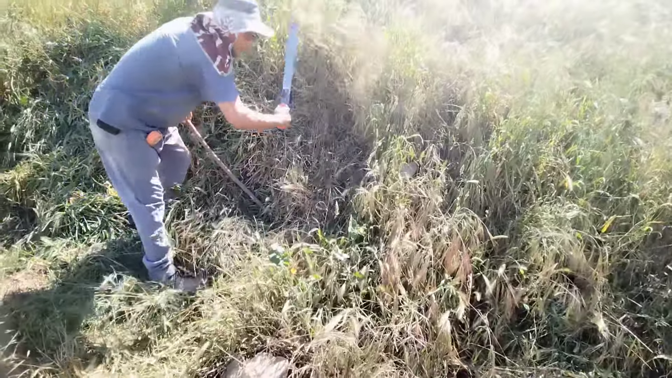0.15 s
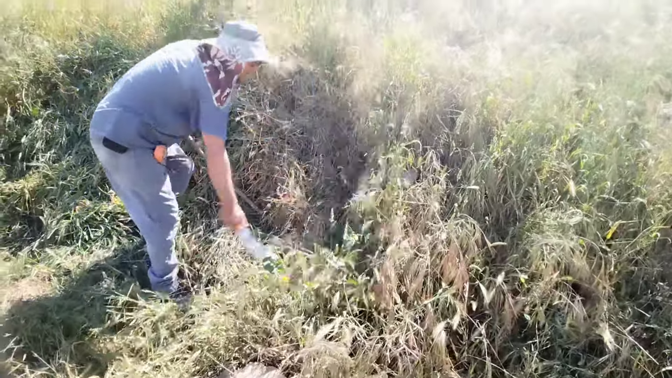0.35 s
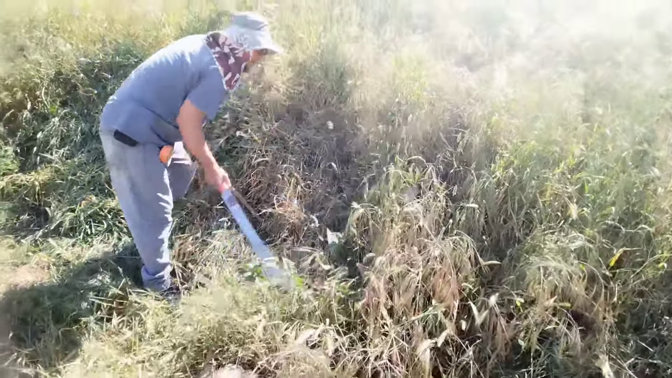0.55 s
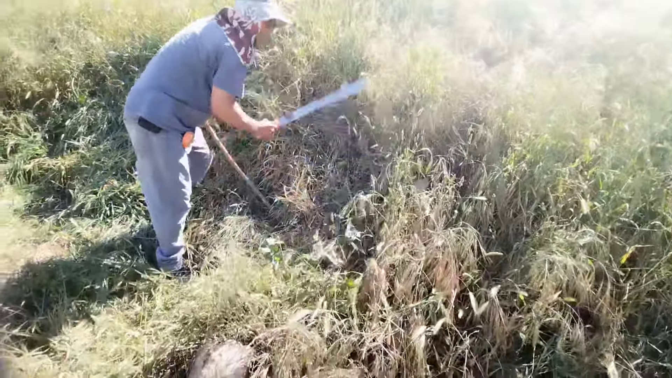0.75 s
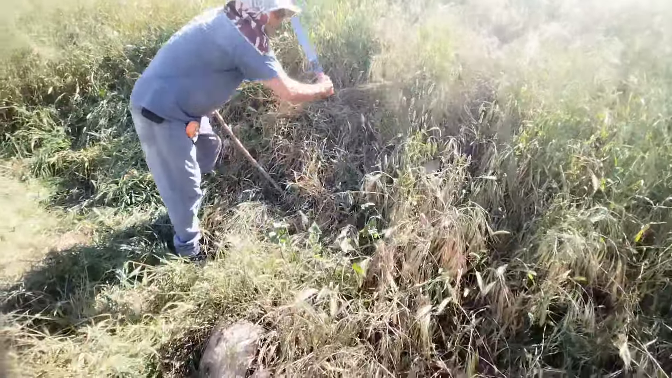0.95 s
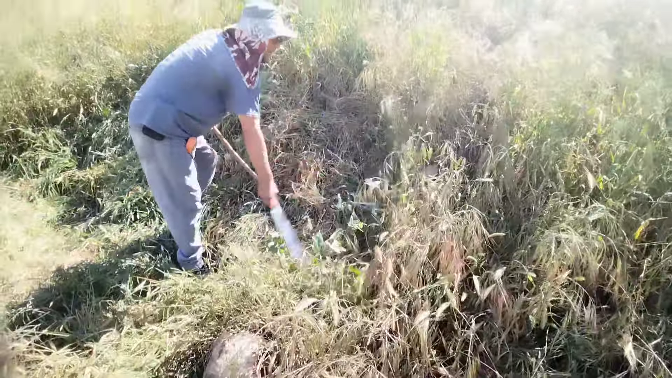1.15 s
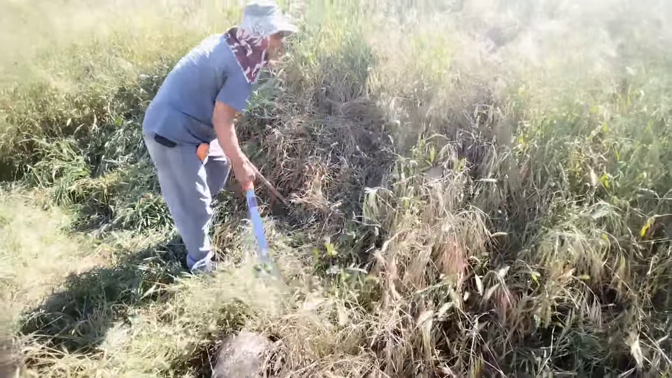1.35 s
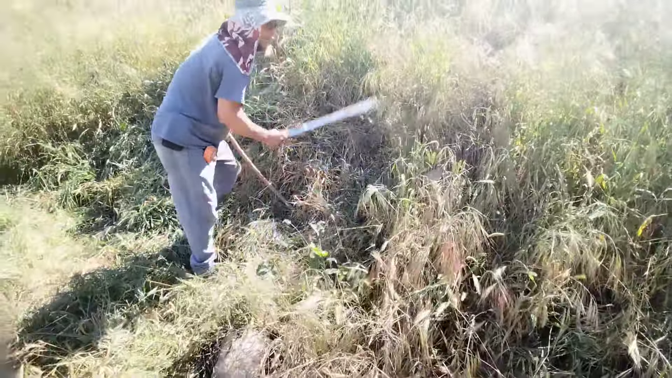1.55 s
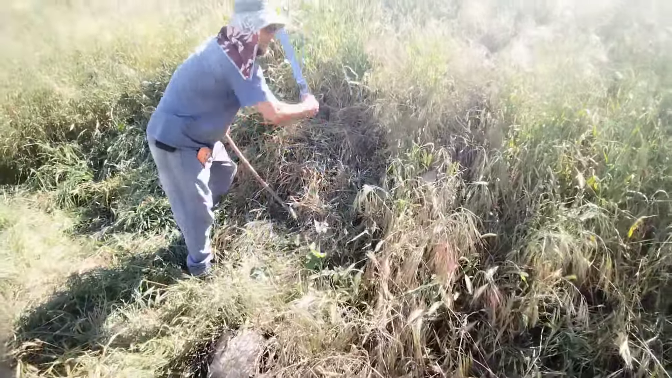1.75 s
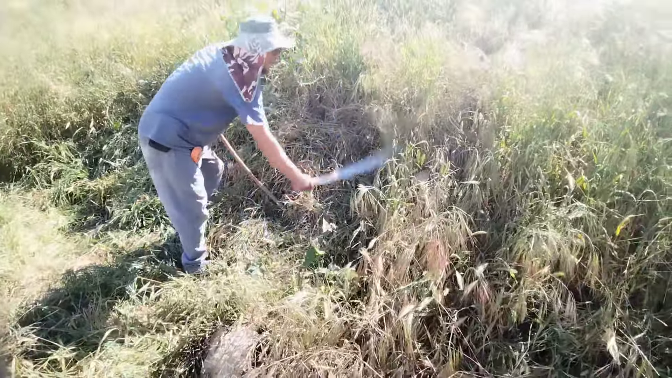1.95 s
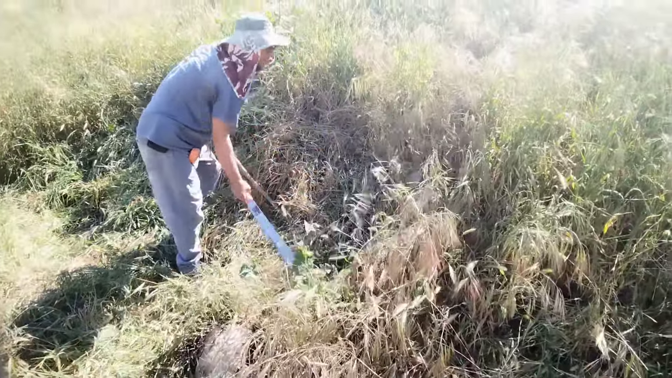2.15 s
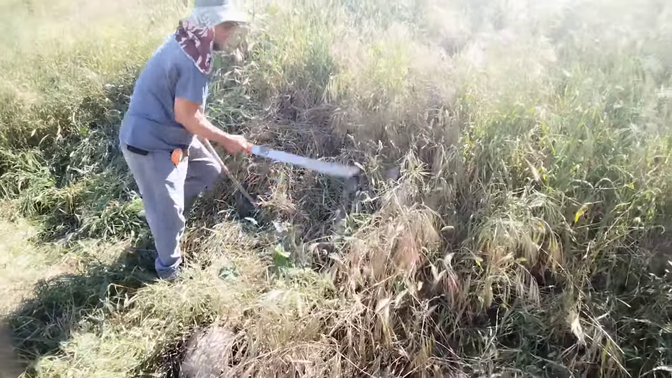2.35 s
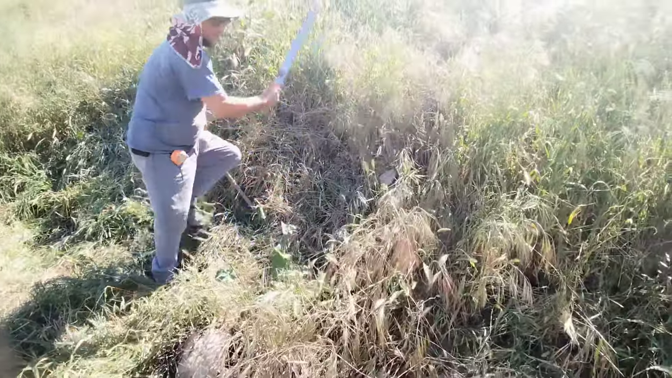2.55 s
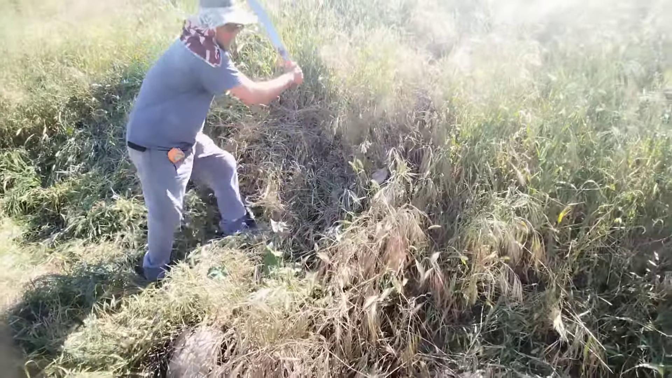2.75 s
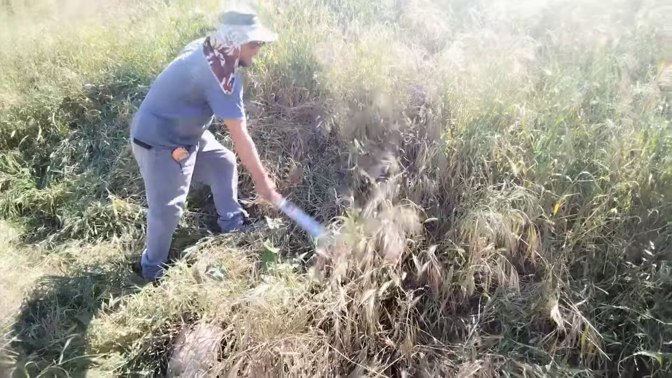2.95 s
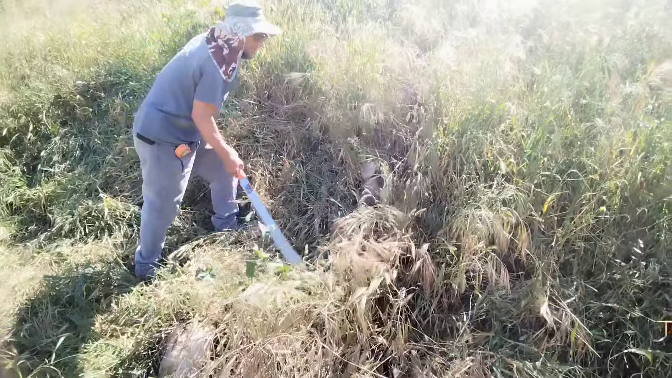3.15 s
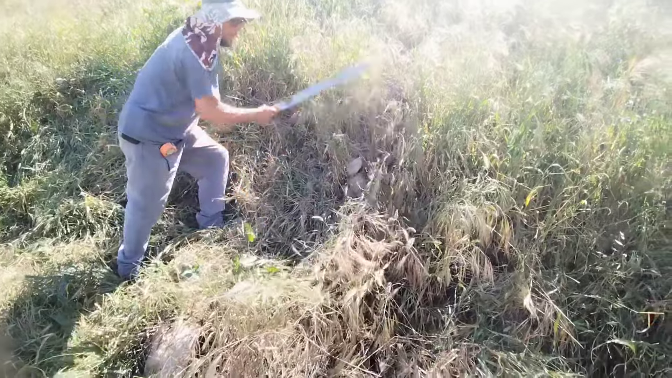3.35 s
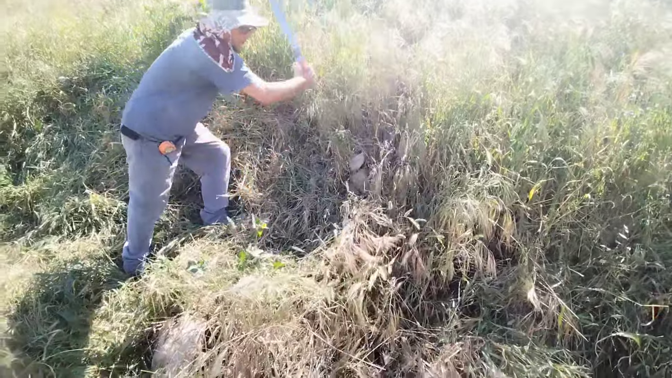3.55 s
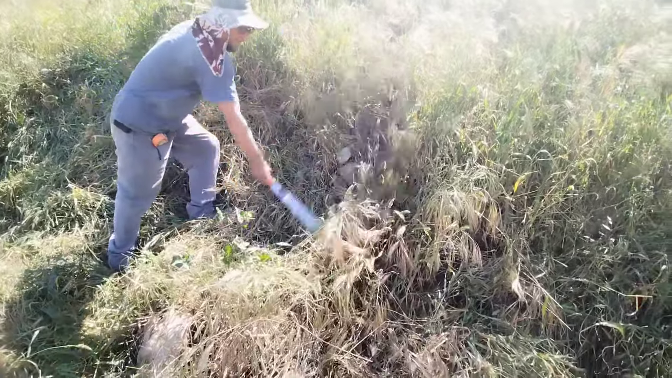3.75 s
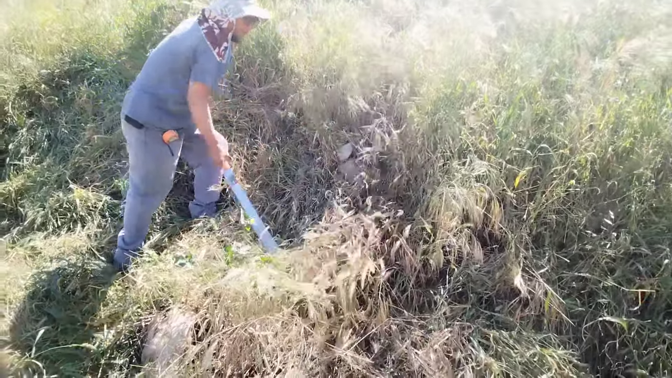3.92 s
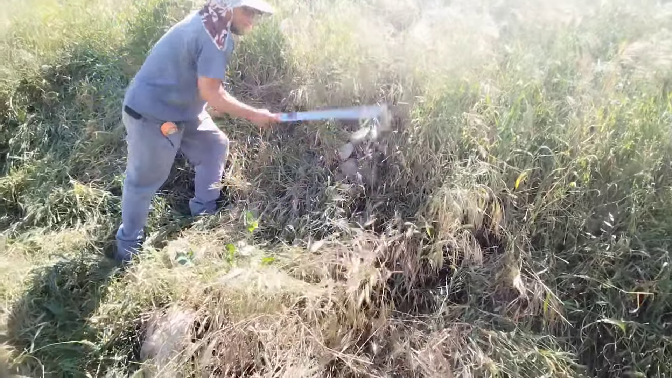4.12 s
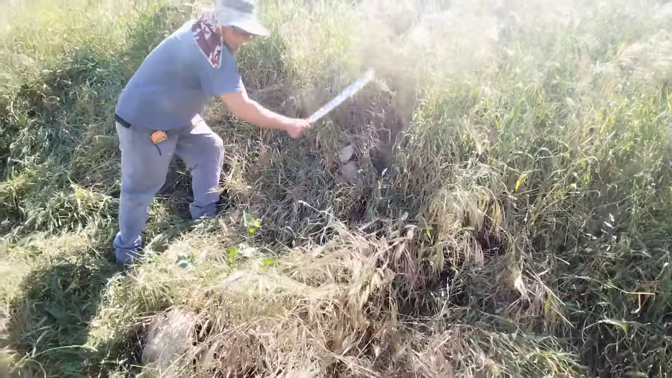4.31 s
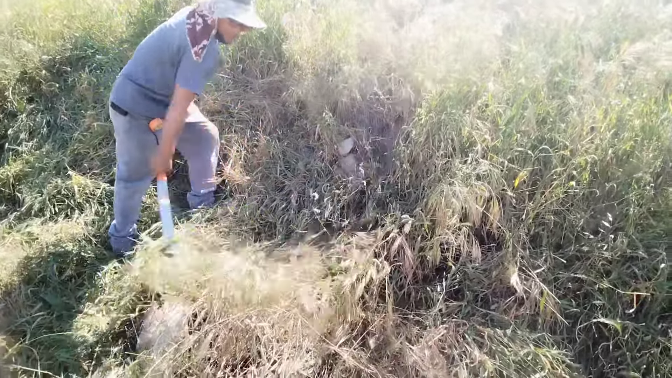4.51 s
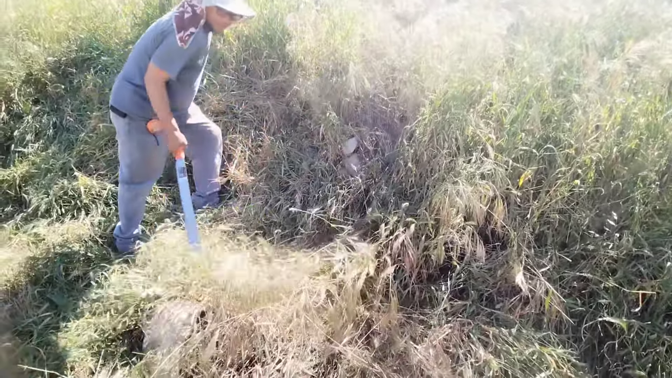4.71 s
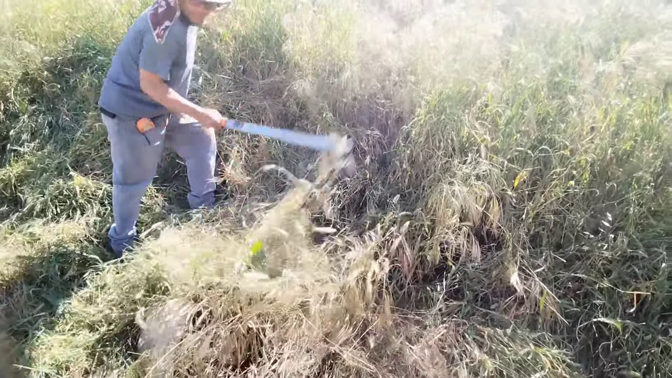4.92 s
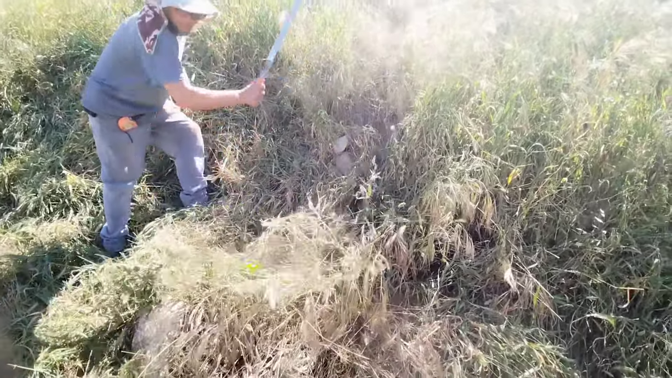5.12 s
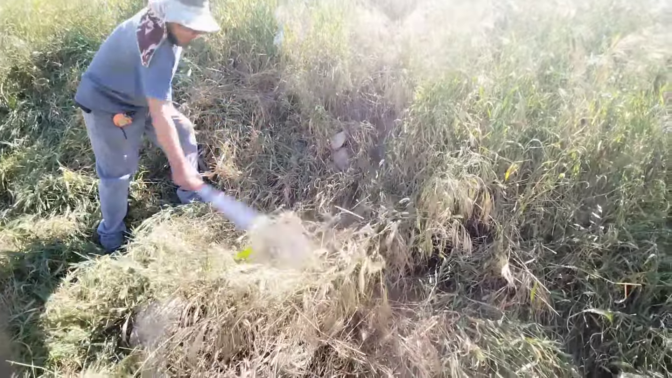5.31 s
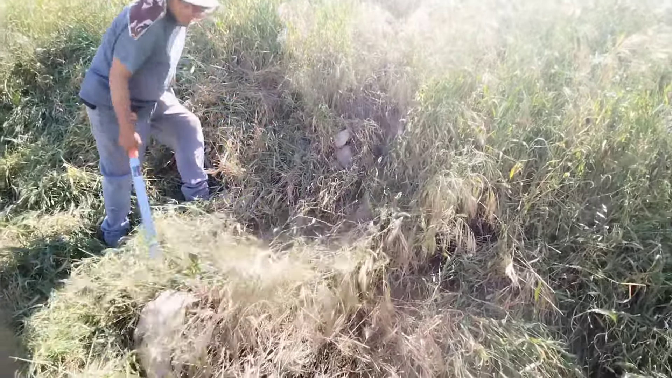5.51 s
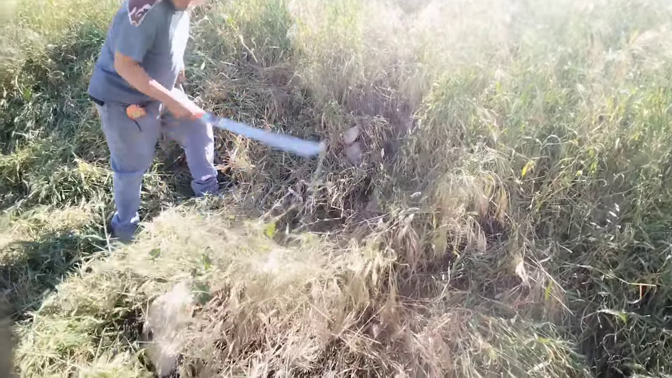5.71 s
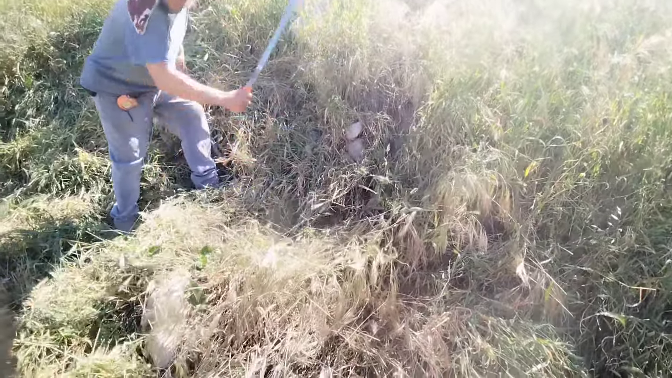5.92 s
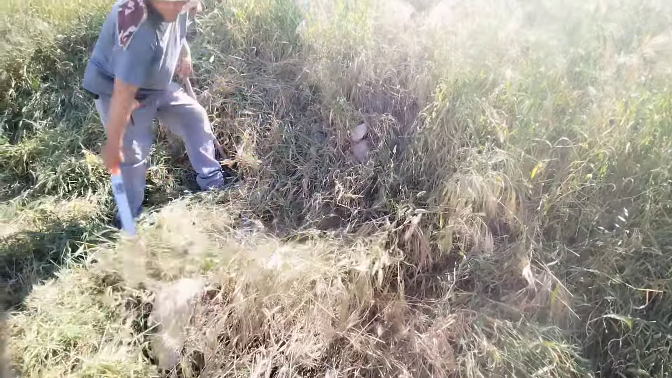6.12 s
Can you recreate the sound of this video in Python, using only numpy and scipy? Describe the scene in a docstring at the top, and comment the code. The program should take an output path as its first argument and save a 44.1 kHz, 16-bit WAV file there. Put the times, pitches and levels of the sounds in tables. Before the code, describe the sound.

In an open field, a machete works through tall dry grass a few metres away, close to dry, over a low, wavering hum like a far engine. Leaves rustle at the start, then crisp, crackling strokes land at about 0.4, 1.2, 2.0, 3.0, 3.75, 4.4, 5.4 and 6.15 seconds. Each lasts about a tenth of a second: a bright hiss of splitting leaves, lower tearing and sharp stalk snaps, some with a fleeting high squeal. The third ends in a short woody knock near 2.1. Between strokes, cut grass settles and loose leaves brush in swelling sweeps, notably at 0.8, 2.5-2.8, 4.3 and 4.9. Thin steel scrapes ring briefly, clearest around 0.8 and 4.1, where two dull thumps also fall. The stroke near 4.4 bites more gradually; the last is short and sharp, fading into rustle and hum.

```python
"""An open field: tall dry grass is cut with a machete a few metres away, in eight strokes.
Each stroke is patchy, crackling noise: a hiss of splitting leaves over a lower tearing of stalks.
Noise swells make the rustle; brief bursts, the snaps; narrow-band noise, the squeals. Scrapes of noise
excite the blade's ringing modes. A knock, thumps and pips are short sines. A low hum of
coloured noise and two wavering tones lies under it all."""
import sys
import numpy as np
from scipy import signal
from scipy.fft import rfft, irfft
from scipy.io import wavfile
from scipy.ndimage import uniform_filter1d

SR = 44100
rng = np.random.default_rng(int(sys.argv[2]) if len(sys.argv) > 2 else 0)


def output_pcm(signal):
    """Save a mono or channel-first signal as 16-bit PCM at the path in sys.argv[1].

    Samples are clipped to [-1, 1] before scaling.
    """
    pcm = np.clip(np.atleast_2d(signal).T, -1, 1) * 32767
    wavfile.write(sys.argv[1], SR, np.round(pcm).astype(np.int16))


N = 276507
TIME = np.arange(N) / SR
FREQS = np.fft.rfftfreq(N, 1 / SR)

# Strokes of the edge through a bunch of stalks: (first touch [s], time to bite in [s], time in the
# bunch [s], time to fade by 20 dB [s], relative hiss of leaves [dB], relative tearing of stalks [dB])
STROKES = [ (0.373, 0.01845, 0.0592, 0.021, -15.5, -27.5), (1.179, 0.01855, 0.057, 0.0793, -15.5, -28),
           (2, 0.024, 0.0805, 0.0516, -15.5, -28), (2.957, 0.0366, 0.0704, 0.0438, -18.5, -35),
           (3.747, 0.058, .06, 0.0656, -17, -27), (4.42, 0.1028, 0.0402, 0.0965, -18.5, -33.5),
           (5.38, 0.0241, 0.0244, 0.0566, -15, -27.5), (6.14, 0.0147, 0.0096, 0.0313, -13, -24.5), ]
# Spectrum of splitting leaves and snapping stalks: (frequency [Hz], relative density [dB per Hz])
SPLITTING_SPECTRUM = [(1060, -39.5), (1800, -12.5), (2020, -29.5), (2290, -1), (2480, -24), (2710, -5.5),
                      (3150, -5), (4110, -12.5), (4780, -5.5), (6340, -3.5), (7440, 3), (10300, -16.5),
                      (13700, -14), (14600, -32), (15000, -44)]
# Cutting at the two microphone ports: (frequency [Hz], left-right correlation [-1 to 1],
# left minus right level [dB])
CUTTING_PORTS = [(300, 1, 7), (1000, 1, 7.5), (1800, 0.84, 5), (2767, 0.64, -7.5), (4230, -0.14, -4.5),
                 (5660, -0.116, -6), (7350, 0.135, 1.5), (11000, -0.23, -5.5)]


def amp(db):
    """Level to amplitude: 20 dB is a factor of ten."""
    return 10 ** (np.asarray(db) / 20)


def evened(x):
    """Normalization: scales to an rms of one."""
    return x / np.sqrt(np.mean(x ** 2) + 1e-20)


def read(points, column=1):
    """Interpolation of one table column along a logarithmic frequency axis."""
    points = np.asarray(points, float)
    return np.interp(np.log(FREQS + 1), np.log(points[:, 0]), points.T[int(column)])


def add(mix, s, sound):
    """Superposition: adds a sound to the mix at time s."""
    part = mix[..., max(round(s * SR), 0):][..., :sound.shape[-1]]
    part += sound[..., :part.shape[-1]]


def pan(db):
    """Interchannel level difference: gains of the two channels for a left minus right level."""
    return amp(np.array([[db], [-db]]) / 2)


def drift(hz):
    """Low-pass filtered noise: slow random wandering with an rms of one."""
    spectrum = rfft(rng.standard_normal(N))
    return evened(irfft(spectrum / (1 + (FREQS / hz) ** 4), N))


def patchy_noise(patchy_db, size=(15, 3)):
    """Time-frequency modulation: two noises share short, narrow peaks, as hollow stalks differ in pitch."""
    z = signal.stft(rng.standard_normal((2, N)), nperseg=1024, noverlap=896)[2]
    frames, bins = size
    patches = uniform_filter1d(rng.standard_normal(z.shape[1:]), frames, axis=1)
    patches = evened(uniform_filter1d(patches, bins, axis=0))
    noise = signal.istft(z * amp(patchy_db * patches), nperseg=1024, noverlap=896)[1]
    return evened(noise[:, :N])


def coloured(size, spectrum, ports, patchy_db=0):
    """Spectral shaping of enveloped noise, with partial correlation between the two ports."""
    noise = patchy_noise(patchy_db) if patchy_db else rng.standard_normal((2, N))
    a, b = rfft(size * noise)
    same = np.clip(read(ports), -.99, .99)
    pair = np.array([a, same * a + np.sqrt(1 - same ** 2) * b])
    left, right = amp(read(ports, 2) / 2), amp(-read(ports, 2) / 2)
    # rms of the mean of both ports; left * right is one
    centre = np.sqrt(left ** 2 + right ** 2 + 2 * same) / 2
    return irfft(pair * [left, right] / centre * evened(amp(read(spectrum))), N)


def crackle(per_s, spread_db, grain_s, smooth):
    """Shot noise of breaking fibres: decaying bursts of very unequal size over a smooth share of power."""
    breaks = rng.random(N)
    burst_db = spread_db * np.minimum(rng.exponential(1, N), 4)
    power = amp(burst_db) ** 2 * (breaks < per_s / SR)
    power = signal.lfilter([1], [1, -np.exp(-1 / (grain_s * SR))], power)
    smooth = np.clip(smooth, 0, 1)
    return np.sqrt(smooth + (1 - smooth) * power / power.mean())


def swell(peak_s, rise_s, fall_s):
    """Exponential growth to one and decay after it, 20 dB in each given time (signs ignored)."""
    return amp(-20 * np.maximum((peak_s - TIME) / abs(rise_s), (TIME - peak_s) / abs(fall_s)))


def shelved(x, hz, low=1, high=1):
    """Band splitting: the parts below and above hz each get their own gain."""
    bass = irfft(rfft(x) / (1 + (FREQS / hz) ** 8), N)
    return low * bass + high * (x - bass)


def hum():
    """Superposed low rumble, as of a far engine, faint open air, and two frequency-modulated tones."""
    # Spectra of rumble and open air: (frequency [Hz], relative density [dB per Hz])
    rumble_spectrum = [(15, -61.5), (25, -28), (35, -37.5), (47, -17.5), (70, -4.5), (102, -1), (124, -2.5),
                       (152, 0.5), (172, -3.5), (252, -6), (279, -8), (383, -26), (520, -32.5),
                       (680, -39.5), (1140, -120)]
    air_spectrum = [(300, 2.5), (500, -19), (700, -3), (1000, -28), (1800, -33.5), (3000, -16.5),
                    (6000, -21), (14000, -29.5)]
    # Hum at the two ports: (frequency [Hz], left-right correlation [-1 to 1], left minus right level [dB])
    hum_ports = [(50, 0.76, 2.96), (300, 0.75, 1), (2000, .4, 7.5)]
    # Rumble and air above the split frequency: (time [s], gain [dB])
    upper_gain = [(0, 0), (1, -4.5), (2.5, 1), (3.7, -1.5), (4.5, 4), (5.7, 3), (6.27, 2)]
    # Tones before their random wavering: (time [s], lower tone level [dB], upper tone level [dB])
    tone_levels = [(0, -53, -43), (1, -54.5, -45.5), (1.7, -46, -38), (3.3, -43.5, -53.5),
                   (4.4, -57, -53.5), (5.2, -39, -62), (6.27, -45.5, -57)]
    # Mean pitches of the tones: (lower [Hz], upper [Hz])
    tone_hz = [105.85, 147.83]
    rumble_db, split_hz = -39.5, 190

    level = amp(rumble_db + 1.37 * drift(hz=4.86))
    out = coloured(level, rumble_spectrum, hum_ports)
    out += coloured(amp(-61.5), air_spectrum, hum_ports)
    out = shelved(out, split_hz, high=amp(np.interp(TIME, *np.transpose(upper_gain))))
    s, *levels = np.transpose(tone_levels)
    for hz, db in zip(tone_hz, levels):
        turns = np.cumsum(hz * (1 + 0.02194 * drift(hz=4.95))) / SR
        tone_amp = amp(np.interp(TIME, s, db) + 2.8 * drift(hz=7))
        out += pan(db=2.7) * tone_amp * np.sin(2 * np.pi * turns)
    return out


def rustle():
    """Friction noise: dry leaves brush as cut grass falls and the blade is drawn back; powers add."""
    # Sweeps of blade and boots through loose grass: (peak time [s], time to swell by 20 dB [s],
    # time to fade by 20 dB [s], relative leaf rustle [dB], relative stalk crunch [dB])
    sweeps = [ (0.02, 2.08, 0.41, -33, -49.5), (0.18, 0.15, 0.78, -34, -39), (0.33, 0.33, .1, -39.5, -46.5),
              (0.831, .5, 0.1764, -35, -53), (1.154, .004, .045, -31, -48.5),
              (1.47, 0.3028, 0.24, -39, -52.5), (1.629, 0.0921, 0.1033, -37, -50.5),
              (1.781, .5, 0.1437, -43.5, -47.5), (2.489, .5, 0.32, -35.5, -45),
              (2.8, 0.4026, 0.0815, -32, -42), (3.23, 0.02, 0.1533, -40, -56.5),
              (3.4, 0.176, 0.1344, -37.5, -49), (3.491, 0.39, 0.0722, -40.5, -51.5),
              (4.099, 0.27, 0.38, -40.5, -53.5), (4.29, 0.4138, 0.07, -36, -49),
              (4.43, 0.1456, 0.09, -33, -49), (4.9, 0.7387, 0.3483, -33, -48),
              (5.52, 0.1762, 0.31, -37, -54), (5.73, 0.2172, 0.1867, -34, -48.5),
              (5.9, -0.4, 0.48, -50.5, -66), ]
    # Spectra of leaves and crunching stalks: (frequency [Hz], relative density [dB per Hz])
    leaf_spectrum = [(1120, -31), (1900, -13.5), (2110, -36), (2280, -9.5), (2530, -12), (3030, -4.5),
                     (4320, -10), (5500, -0.5), (6370, 0), (7380, 2.5), (10500, -12), (13900, -9.5),
                     (14600, -26.5), (15000, -49)]
    crunch_spectrum = [(60, -38), (250, -3.5), (450, -1.5), (750, 4), (1200, -4.5), (1800, 0), (2600, 3),
                       (4000, -15)]
    # Rustle at the two ports: (frequency [Hz], left-right correlation [-1 to 1],
    # left minus right level [dB])
    rustle_ports = [(703, 0.55, 2), (1810, 0.28, 1.5), (2734, -0.13, -16), (4200, 0.067, -8),
                    (5650, 0.071, -11.5), (7340, 0.096, -2.5), (11000, -0.067, -11.5)]
    # after every stroke the cut grass settles, fading by 20 dB in settle_s
    settle_leaf_db, settle_crunch_db, settle_s = -39, -50, 0.47
    # dry grass is never quite still; leaves moving more gently than soft_db only fizz, above fizz_hz
    stir_db, soft_db, fizz_hz = -64, -43.5, 2500

    settling = []
    for touch, bite_s, bunch_s, *_ in STROKES:
        stroke_end = touch + bite_s + bunch_s
        settling.append((stroke_end, bunch_s, settle_s, settle_leaf_db, settle_crunch_db))
    leaf_power, crunch_power = amp(stir_db) ** 2, 0
    for peak_s, rise_s, fall_s, leaf_db, crunch_db in sweeps + settling:
        motion = swell(peak_s, rise_s, fall_s)
        leaf_power = leaf_power + (amp(leaf_db) * motion) ** 2
        crunch_power = crunch_power + (amp(crunch_db) * motion) ** 2
    clumps = evened(amp(0.82 * drift(hz=44.7)))
    leaves = np.sqrt(leaf_power) * clumps
    leaves *= crackle(per_s=1500, spread_db=2.5, grain_s=.0006, smooth=.65)
    crunch = np.sqrt(crunch_power) * clumps
    crunch *= crackle(per_s=200, spread_db=3.5, grain_s=0.0021, smooth=0.458)
    out = amp(1.58) * coloured(leaves, leaf_spectrum, rustle_ports, patchy_db=3)
    out += amp(1.0) * coloured(crunch, crunch_spectrum, rustle_ports, patchy_db=4.0)
    return shelved(out, fizz_hz, low=np.sqrt(leaf_power / (leaf_power + amp(soft_db) ** 2)))


def snaps(decay_s=0.00245):
    """Impulsive fracture: a thick stalk gives way in one brief, exponentially decaying crack."""
    # Single stalks snapping: (time [s], relative initial level [dB])
    cracks = [(0.213, -15), (0.3474, -9.5), (0.4014, -0.5), (0.4502, -0.5), (1.1507, -10), (1.2114, 1.5),
              (1.9146, -29.5), (1.942, -27), (2.043, -2), (2.091, -1), (2.1469, -14), (2.976, -10),
              (3.0095, -1.5), (3.0683, -7), (3.8095, 2), (3.838, -2), (5.384, -17.5), (6.1546, -1.5)]
    size, t = np.zeros(N), TIME[:2048]
    for s, db in cracks:
        add(size, s, amp(db) * np.exp(-t / decay_s))
    return amp(-9) * coloured(size, SPLITTING_SPECTRUM, CUTTING_PORTS)


def cuts():
    """Successive fracture: the edge splits a bunch densely, with a lower tearing body."""
    # Spectrum of tearing thick stalks: (frequency [Hz], relative density [dB per Hz])
    tear_spectrum = [(30, -55.5), (100, -24.5), (250, 1), (450, -9), (700, -0.5), (1200, -5), (1800, -4),
                     (2600, -1.5), (4000, -21.5)]
    # the first leaves are quieter than the bunch; through the bunch the hiss sags and the tearing grows
    touch_hiss_db, touch_tear_db, hiss_sag_db, tear_growth_db = -18, -23.5, -2.5, 4.5

    hiss, tear = np.zeros((2, N))
    for touch, bite_s, bunch_s, fade_s, hiss_db, tear_db in STROKES:
        stages = touch + np.cumsum([0, bite_s, bunch_s])
        onset = np.clip((TIME - touch) / 0.00336, 0, 1)
        contact = onset * amp(-20 * np.maximum(TIME - stages[-1], 0) / fade_s)
        hiss += contact * amp(hiss_db + np.interp(TIME, stages, [touch_hiss_db, 0, hiss_sag_db]))
        tear += contact * amp(tear_db + np.interp(TIME, stages, [touch_tear_db, -tear_growth_db, 0]))
    clumps = evened(amp(0.91 * drift(hz=110)))  # stalks stand in tufts
    hiss *= clumps * crackle(per_s=2600, spread_db=2.2, grain_s=.0005, smooth=.45)
    tear *= clumps * crackle(per_s=900, spread_db=2.5, grain_s=.001, smooth=.35)
    hiss = amp(-.5) * coloured(hiss, SPLITTING_SPECTRUM, CUTTING_PORTS, patchy_db=4.5)
    tear = amp(1.5) * coloured(tear, tear_spectrum, CUTTING_PORTS, patchy_db=2)
    return hiss + tear


def squeals():
    """Stick-slip friction: a stalk on the edge gives a short, fuzzy whistle of narrow-band noise."""
    # Squeals against the edge: (time [s], length [s], centre frequency [Hz], width at half
    # amplitude [Hz], level [dB], left minus right level [dB])
    whistles = [(0.389, 0.061, 7360, 160, -23, 5), (1.146, 0.066, 2742, 79, -35, -13.5),
                (1.148, 0.061, 3133, 110, -39.5, -15), (2.022, 0.099, 7434, 204, -30, -2.5),
                (3.004, 0.0204, 7360, 120, -16.5, 3.5), (3.066, 0.0187, 4940, 120, -29, -6),
                (3.807, 0.069, 7354, 200, -24.5, 1.5), (4.418, 0.072, 8007, 100, -32, -6),
                (4.512, 0.0277, 6778, 100, -20.5, -2.5), (5.392, 0.0223, 2289, 90, -23, 4.5)]
    out = np.zeros((2, N))
    for s, length, hz, width, db, side_db in whistles:
        count = int(length * SR)
        resonance = 1 / (1 + (2 * (FREQS - hz) / width) ** 2)
        tone = irfft(rfft(rng.standard_normal(N)) * resonance, N)[:count]
        add(out, s, pan(side_db) * amp(db) * evened(tone) * signal.windows.tukey(count, .1))
    return out


def small_sounds():
    """Damped sines knock on wood; windowed sines give dull thumps of a few cycles and pips of about ten."""
    # The blade knocks on a woody stem: (time [s], level [dB])
    knock = (2.1038, -8)
    # Modes of the stem: (frequency [Hz], relative level [dB], time to decay by 60 dB [s])
    wood_modes = [(910, -22.5, .02), (1450, -29, 0.02016), (1875, 4.5, 0.0178), (2235, -0.5, 0.03),
                  (2825, -6, 0.02)]
    # Dull thumps and short hollow pips: (time [s], length [s], frequency [Hz], level before panning [dB])
    thumps = [(4.106, 0.01064, 160, -16), (4.193, 0.0155, 148.5, -24)]
    pips = [(0.665, 0.0088, 1000, -36.5), (2.293, 0.011, 886, -37), (4.352, 0.0202, 690, -37.5)]
    out, t = np.zeros(N), TIME[:4096]
    knock_s, knock_db = knock
    for hz, db, t60 in wood_modes:
        add(out, knock_s, amp(knock_db + db - 60 * t / t60) * np.sin(2 * np.pi * hz * t))
    for s, length, hz, db in thumps + pips:
        t = np.arange(0, length, 1 / SR)
        add(out, s, amp(db) * np.hanning(len(t)) * np.sin(2 * np.pi * hz * (length / 2 - t)))
    return pan(db=8) * out


def buried(s):
    """Contact interval: whether the blade is inside a bunch at time s."""
    return any(touch <= s <= touch + bite_s + bunch_s for touch, bite_s, bunch_s, *_ in STROKES)


def blade(bite=18):
    """Modal resonance: scrapes drive the blade's modes near their pitch; the grass damps the ringing."""
    # Bending modes: (frequency [Hz], relative level [dB], 60 dB decay time before the ring factor [s])
    bending_modes = [(2282, -2, 0.516), (2711, 4.5, 0.489), (3083.6, 1, 0.282), (3417, -3, .25),
                     (3754, -8, .2), (4960, 3.5, 0.27), (5120, 8, 0.242), (5567, -6, .2), (5690, -4.5, .25),
                     (6008, -3, 0.17), (6410, -3.5, .2), (6680, 0, .2), (7289, 3.5, 0.205),
                     (7790, -21, 0.057), (8400, -4.5, .15)]
    # Stalks scraping along the steel: (time [s], length [s], relative level [dB],
    # frequency most excited [Hz], spread [octaves])
    scrapes = [ (0.674, 0.194, -49.5, 2240, 0.144), (0.819, .045, -32, 2595, 0.29),
               (0.822, 0.049, -33.5, 7250, 0.085), (1.207, 0.0324, -29, 3440, 0.14),
               (1.427, 0.108, -52.5, 2270, 0.227), (1.624, 0.0243, -38, 2600, 0.44),
               (2.008, 0.03, -29.5, 2860, 0.194), (2.472, 0.145, -38.5, 7000, 0.464),
               (2.534, 0.0916, -39, 2283, 0.217), (2.968, 0.103, -34, 3090, 0.172),
               (3.261, 0.127, -51.5, 2280, 0.237), (3.356, 0.031, -43, 3230, 0.182),
               (3.36, 0.041, -40.5, 5600, 0.27), (3.486, 0.0277, -50, 2880, 0.53),
               (3.78, 0.072, -33, 2960, 0.25), (3.963, 0.31, -42.5, 2160, .11),
               (4.088, 0.0277, -32, 5973, 0.171), (4.139, 0.06, -33, 3186, 0.177),
               (4.14, 0.102, -35.5, 6365, 0.238), (4.417, 0.0214, -33.5, 3150, 0.133),
               (4.478, 0.072, -31.5, 3030, 0.376), (5.18, 0.041, -52.5, 3007, 0.217),
               (5.692, 0.0384, -52, 2430, 0.29), (6.157, .015, -32, 3000, 0.43), ]
    # factor on the decay time, in the open and while the blade is buried in a bunch
    free_ring, buried_ring = 0.857, 0.42

    out, t = np.zeros((2, N)), TIME[:SR // 2]
    hz, mode_db, t60 = np.transpose(bending_modes)[:, :, None]
    for s, length, db, centre_hz, spread in scrapes:
        ring = buried_ring if buried(s) else free_ring
        rings = np.exp((2j * np.pi * hz - np.log(1000) / (t60 * ring)) * t)
        drive = np.clip(1 - (t / length) ** 4, 0, 1) * rng.standard_normal(len(t))
        drive[0] += bite  # the stalk catches, then slides
        modes = signal.fftconvolve(drive[None], rings, axes=1)[:, :len(t)]
        nearness = np.exp(-(np.log2(hz / centre_hz) / spread) ** 2)
        weight = amp(mode_db) * (nearness + 0.065)
        modes *= weight / np.linalg.norm(weight) / abs(modes).max(1, keepdims=True)
        # each mode radiates its own way to the two channels
        phase = 2 * np.pi * rng.random(len(bending_modes))
        phase = phase + 0.4 * rng.standard_normal((2, len(bending_modes)))
        add(out, s, amp(db) * (np.exp(1j * phase) @ modes).real)
    return amp(7.0) * pan(db=-12.5) * out


def field(x, t60=0.102, wet_db=-13):
    """Diffuse scattering: the standing grass adds a short, weak tail of decaying noise."""
    t = TIME[:8192]
    tail = rng.standard_normal((2, len(t))) * amp(-60 * t / t60) * (t > .003)
    tail /= np.linalg.norm(tail[0])
    return x + amp(wet_db) * signal.fftconvolve(x, tail, axes=1)[:, :N]


def scene():
    """Superposition of the scattered grass work and the hum."""
    work = cuts() + rustle() + snaps() + blade() + squeals() + small_sounds()
    return field(work) + hum()


def record(dry):
    """Soft saturation, then band limiting: the recorder rounds off the highest peaks and low-passes."""
    ceiling_db, edge_hz = -6, 14500
    rounded = dry / (1 + (dry / amp(ceiling_db)) ** 4) ** (1 / 4)
    lowpass = signal.firwin(401, edge_hz, window=("kaiser", 8), fs=SR)
    return signal.oaconvolve(rounded, lowpass[None], "same", axes=1)


dry = scene()
out = record(dry)
output_pcm(out)
```